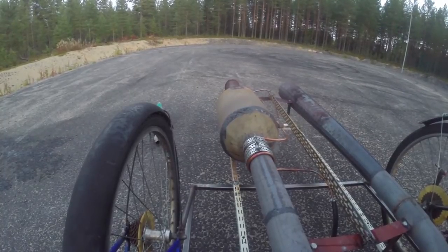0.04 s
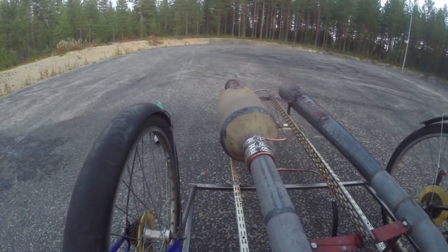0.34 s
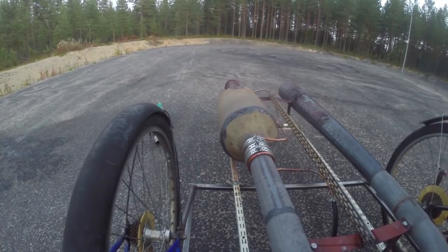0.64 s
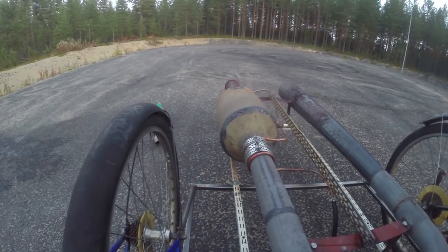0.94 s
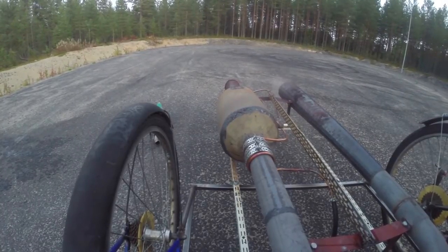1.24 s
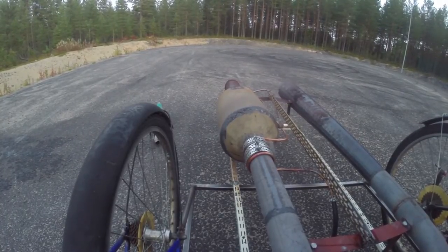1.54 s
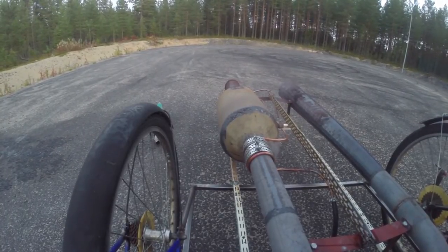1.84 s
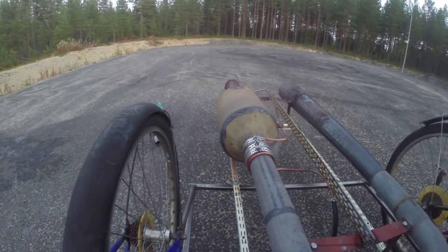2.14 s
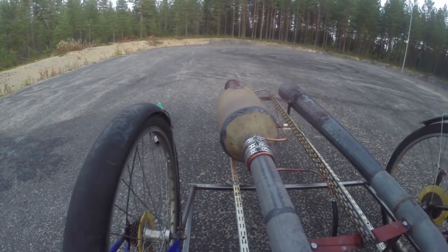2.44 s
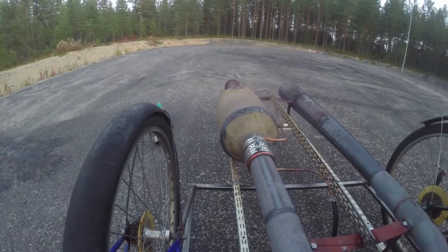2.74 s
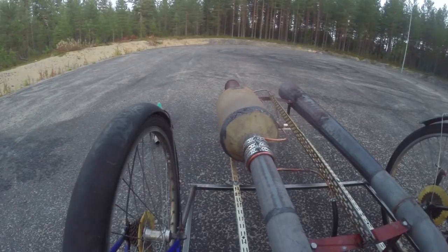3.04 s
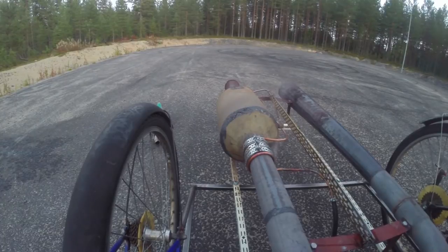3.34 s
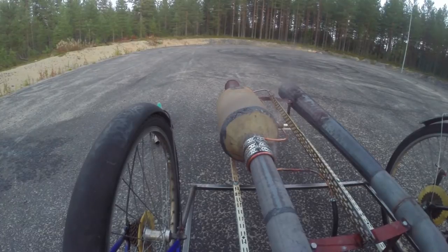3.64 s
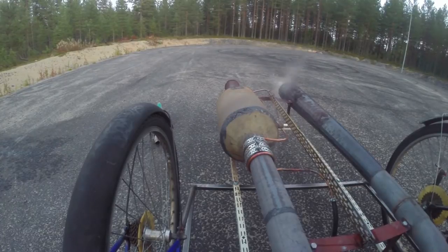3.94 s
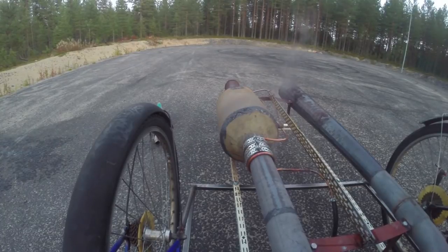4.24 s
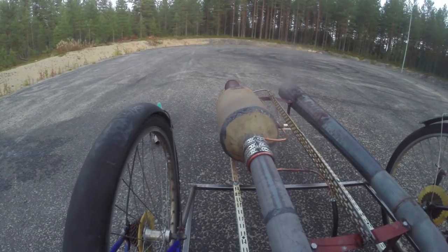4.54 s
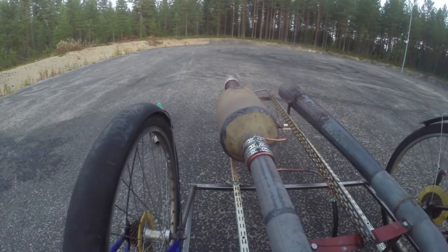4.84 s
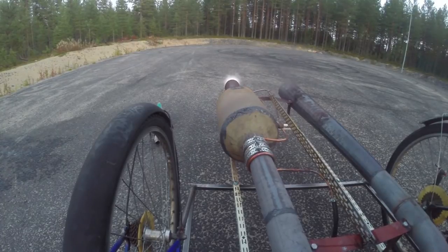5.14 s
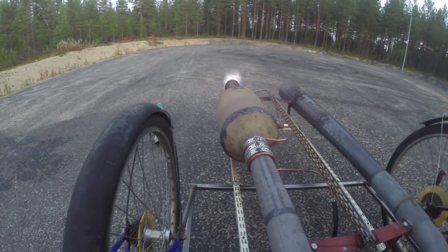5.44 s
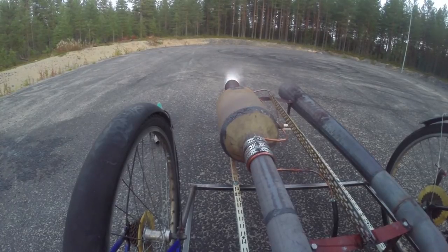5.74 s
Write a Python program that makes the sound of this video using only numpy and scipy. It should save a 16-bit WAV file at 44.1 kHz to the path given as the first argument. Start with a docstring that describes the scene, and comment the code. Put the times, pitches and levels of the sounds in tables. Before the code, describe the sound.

A pulsejet engine booms with a loud, rasping drone, faltering and sputtering, then speeds up and roars with flame.

```python
"""A loud, rasping boom, about sixty firings a second: a home-made pulsejet on a pedal trike parked in a
gravel lot, the microphone just behind its pipe. The gas column booms, hot gas rasps out with every
firing and the steel pipe knocks. The engine keeps faltering, hooting and catching again. Twice it runs
weak and sputters, hard bangs alternating with feeble ones; then it gets more fuel, speeds up and roars,
with flame at the mouth. A breathy draught and a low rumble lie underneath."""
import sys
import numpy as np
from scipy import signal
from scipy.fft import rfft, irfft
from scipy.io import wavfile

SR = 44100
rng = np.random.default_rng(int(sys.argv[2]) if len(sys.argv) > 2 else 0)


def unload_audio(sound):
    """Save the sound as a 16-bit wav file, at the path given as the first command line argument."""
    columns = np.transpose(np.atleast_2d(sound))
    # keep every value between -1 and 1, then stretch to whole-number steps
    steps = np.round(np.clip(columns, -1, 1) * 32767)
    wavfile.write(sys.argv[1], SR, steps.astype(np.int16))


N = 264600
TIME = np.arange(N) / SR

# hard firings: (time [s], crack level [relative dB], drop to the next firing [relative dB])
HARD_FIRINGS = [(0.343, -40, 4.5), (1.119, -42.5, 7), (1.26, -38.5, 9), (1.295, -38.5, 16),
                (1.327, -60, 12.5), (1.363, -37, 17.5), (1.45, -40, -4.5), (1.536, -43, -2),
                (1.944, -39, -0.5), (2.066, -45, 7.5), (2.196, -36, 1.5), (2.596, -41, 0), (2.632, -39, 4),
                (3.118, -62, 15), (3.152, -33.5, 19.5), (3.187, -54, 3), (3.22, -55, 8.5),
                (3.256, -53, 12.5), (3.288, -43, 11), (3.323, -51, 13), (3.422, -39.5, 18.5),
                (3.678, -38.5, 21), (3.778, -37.5, 20.5), (4, -32.5, 26), (4.067, -39, 3),
                (4.238, -39.5, 18), (4.483, -37, 4.5), (4.703, -41, 0), (4.818, -35.5, 0.5),
                (4.883, -32, -4.5), (4.944, -33.5, 1.5), (5.098, -36, 1.5), (5.234, -34, -1),
                (5.262, -29, -4), (5.456, -27.5, 4.5), (5.471, -25.5, 1), (5.558, -34, 3),
                (5.603, -35, 3.5), (5.719, -28.5, -0.5), (5.749, -32.5, -5), (5.803, -46, -1),
                (5.883, -26.5, -1.5), (5.937, -33, -0.5)]
# steel pipe resonances: (frequency [Hz], width [Hz], level [relative dB])
PIPE_MODES = [(404, 50, -10.5), (533, 61, -0.5), (676, 340, -9), (805, 92, 18), (860, 66, 5.5),
              (996, 150, 0.5), (1880, 160, -2.5), (4300, 570, -2.5)]
# spectrum of the turbulence in the pipe: (frequency [Hz], density [relative dB])
ROAR_SPECTRUM = [(330, 6), (420, 6.5), (500, -0.5), (600, 4.5), (720, -2), (830, -5), (930, 1),
                 (1080, -0.5), (1230, -7.5), (1450, -34)]


def burn_state():
    """How far the burn is faltering, running weak and taking extra fuel at each moment."""
    # the burn stumbles and catches again: (time [s], length [s], depth [1 = a clear stumble])
    falters = [(.07, .07, .5), (.3, .05, .9), (.46, .07, 1.1), (.67, .08, .5), (.81, .07, 1),
               (.98, .08, .35), (1.21, .12, 1.6), (1.42, .07, 1.4), (1.5, .08, .55), (1.74, .11, .95),
               (2, .09, .75), (2.13, .07, .9), (2.27, .07, .55), (2.45, .09, .3), (2.57, .08, 1.15),
               (2.76, .1, .6), (2.98, .09, 1.1), (3.07, .08, .9), (3.46, .04, .75), (3.63, .08, .55),
               (4.2, .07, .25), (4.8, .08, .35), (5, .08, .4), (5.37, .12, .6), (5.52, .07, .5),
               (5.65, .08, .8), (5.82, .08, .66)]
    # spells of weak running: (start [s], end [s])
    weak_spells = [(1.3, 1.38), (3.07, 4.31)]
    # extra fuel: (time [s], share of full feed [0-1])
    fuel_feed = [(4.25, 0), (4.4, .06), (4.8, .14), (4.92, .35), (5.08, .33), (5.2, .7), (5.55, .8),
                 (5.75, .92), (6, 1)]
    sink_s, recover_s = .068, .12
    weak = sum(np.clip(np.minimum((TIME - start) / sink_s, (end - TIME) / recover_s) + .5, 0, 1)
               for start, end in weak_spells)
    fuel, = in_time(fuel_feed)
    return swells(falters), weak, fuel


def firing_cycle(rate_hz):
    """Count of firings so far, drawn into step with the hard ones; ignition comes a bit early or late."""
    bang_phase, step_in_s = .051, .42   # where in its cycle a hard firing cracks; time to fall into step
    cycle = np.cumsum(rate_hz) / SR
    bang_s = np.array(HARD_FIRINGS)[:, 0]
    slip = np.unwrap((bang_phase - np.interp(bang_s, TIME, cycle)) % 1, period=1)
    nearness = np.exp(-((bang_s[:, None] - bang_s) / step_in_s) ** 2)
    cycle += np.interp(TIME, bang_s, nearness @ slip / nearness.sum(axis=1))
    return cycle + .006 * per_firing(cycle)


def sputter_db(rate_hz, surge, starve, width_s):
    """A hard firing swings the gas further and starves the firing after it."""
    marks = np.zeros(N)
    for time_s, _, drop_db in HARD_FIRINGS:
        at = round(time_s * SR)
        marks[at] += surge * drop_db
        marks[at + round(SR / rate_hz[at])] -= starve * drop_db
    return signal.fftconvolve(marks, signal.windows.gaussian(SR // 10 + 1, width_s * SR), "same")


def harmonic_levels(cycle, falter, weak, fuel):
    """The boom's first five harmonics follow the burn and wander; the upper three swell in the hoots."""
    # harmonics 1 to 5 by row: (steady level [dB], change in a falter [dB], when weak [dB], full fuel [dB])
    responses = [(-11.5, -2, -0.4, -6.5), (-16, -3.5, -5, -5.5), (-24.5, 0, 2.5, -9),
                 (-27.5, -4.5, -11, -1), (-35, 0, -3, 5)]
    # the pipe overblows and hoots: (time [s], length [s], swell of harmonic 3 [dB], 4 [dB], 5 [dB])
    hoots = [(.33, .05, 2.1, 3, 2), (.49, .06, 9.8, 0, 2), (.85, .07, 6.2, 8.5, 8),
             (1.19, 0.045, 8.7, -1, 0), (1.51, 0.071, 11.2, -2, 7), (1.77, 0.07, 8.7, 6, 8),
             (2.07, 0.056, 7.3, -2, 3), (2.18, 0.094, 4, 2.5, 6), (2.6, 0.1, 8.6, 5.5, 12),
             (3.02, 0.1, 8.5, -2, 4), (3.32, 0.094, 3.3, -7, 7), (3.57, 0.1, 3.6, 3.5, 8),
             (3.92, .07, 2, -11, 4.5), (3.83, 0.11, 2.1, 4, 4.5), (4.08, .07, 0.87, 13.5, 2.5),
             (4.17, 0.077, 3.3, 0, -10), (4.33, .09, 9.8, 7, 8), (5.24, 0.1, 1, 1.5, 6)]
    # slow chance swell of harmonics 1 to 5: (spread [dB])
    wander_db = [.1, 0.37, 0.6, 1.2, 1.2]
    time_s, length_s, *heights_db = np.transpose(hoots)
    hoots_db = [0, 0] + [swells(zip(time_s, length_s, column)) for column in heights_db]
    late_fuel = fuel ** 1.5   # the boom changes most as the feed nears full
    return [follow(response, falter, weak, late_fuel) + hoot_db + spread_db * per_firing(cycle / 4)
            for response, hoot_db, spread_db in zip(responses, hoots_db, wander_db)]


def gas_column(cycle, state, chug_db, swing_db, lag, open_end_hz):
    """The gas booms at the firing rate; higher harmonics lag and vary more from cycle to cycle."""
    # top harmonics together: (steady level [dB], change in a falter [dB], when weak [dB], full fuel [dB])
    top_response = (-28, -2.5, -16, -4)
    # top harmonics: (multiple of the firing rate, offset from their shared level [dB])
    overtones = [(6, -14), (7, -9.5)]
    top_db = follow(top_response, *state) + chug_db
    levels = [(k, db + swing_db / k ** .5 + .25 * k * per_firing(cycle))
              for k, db in enumerate(harmonic_levels(cycle, *state), start=1)]
    levels += [(k, top_db + db + 1.7 * per_firing(cycle)) for k, db in overtones]
    wave = sum(np.sqrt(2) * from_db(db) * np.cos(2 * np.pi * (k * cycle - lag * (k - 1) ** 2))
               for k, db in levels)
    open_end = signal.butter(4, open_end_hz, "high", fs=SR, output="sos")   # slow flow hardly radiates
    return signal.sosfiltfilt(open_end, wave, padtype="even", padlen=SR // 10)


def pipe_roar(cycle, force, steady):
    """Turbulence in the pipe swells three times a cycle: outflow, suction and rebound."""
    outflow = force * lobe(cycle, .0083, .099)
    suction = lobe(cycle, .31, .055)
    rebound = .5 * lobe(cycle, .6, .074)
    flow = (steady + outflow + suction + rebound) / np.sqrt(1 + force)
    return through_pipe(noise(ROAR_SPECTRUM) * flow * uneven(cycle, spread_db=2), ring_db=-2.5)


def pipe_knock(cycle, delay_cycles, soft_hz):
    """The pressure collapses shortly after each firing and gives the pipe's resonances a soft knock."""
    count = np.floor(cycle - delay_cycles + .0066 * per_firing(cycle))
    knocks = np.diff(count, prepend=count[0]) * uneven(cycle, spread_db=5.5)
    softened = signal.sosfilt(signal.butter(4, soft_hz, fs=SR, output="sos"), knocks + 1e-18)
    ringing = sum(from_db(db) * uneven(cycle, spread_db=3.6) * resonance(softened, hz, width_hz)
                  for hz, width_hz, db in PIPE_MODES)
    return -rms_one(ringing)


def exhaust_rasp(cycle, force, swing_db, steady):
    """Over a steady hiss, hot gas leaves in one bright spurt per firing, with a ragged trailing gust."""
    # the exhaust, close to the mouth: (frequency [Hz], density [relative dB])
    spectrum = [(900, 0), (1250, -6), (1550, -5), (2000, -1.5), (2300, -7), (2650, -6), (3100, -15),
                (3600, -16), (4400, -15.5), (5100, -24), (6300, -20), (8200, -28), (9800, -37),
                (15000, -56.5)]
    gust = .28 * lobe(cycle + .12 * per_firing(cycle), .24, .11) * uneven(cycle, spread_db=5.5)
    spurt = 2.26 * puff(cycle, start=-.092, rise=.028, decay=.11)
    pulses = (spurt + gust) * from_db(swing_db) * uneven(cycle, spread_db=4.5)
    flow = (steady + force * pulses) / (1 + force)
    return through_pipe(noise(spectrum) * flow, ring_db=-7)


def bangs(rise_s, crack_decay_s, bark_delay_s, bark_decay_s):
    """Hard firings spit a short, broad burst of noise; the collapse after it makes the pipe bark."""
    # the crack: (frequency [Hz], density [relative dB])
    spectrum = [(200, -15), (600, 2.5), (950, 9), (1400, -7), (2000, -1), (3200, -13.5), (4300, -19.5),
                (5200, -24.5), (6500, -23), (9000, -35.5), (15000, -45)]
    time_s, crack_db, _ = np.transpose(HARD_FIRINGS)
    marks = np.zeros(N)
    marks[np.round(time_s * SR).astype(int)] = from_db(crack_db)
    age = np.arange(-SR // 20, SR // 20 + 1) / SR

    def bursts(delay_s, decay_s):
        shape = np.exp(np.minimum((age - delay_s) / rise_s, (delay_s - age) / decay_s))
        return signal.fftconvolve(marks, shape, "same")
    crack = bursts(0, crack_decay_s) * noise(spectrum)
    bark = bursts(bark_delay_s, bark_decay_s) * noise(ROAR_SPECTRUM)
    return from_db(8) * crack + from_db(12) * bark


def flame(cycle):
    """With more fuel a tongue of flame shoots out of the mouth at every firing and burns in open air."""
    # flame at the mouth: (time [s], level [dB])
    levels = [(0, -70.5), (4.4, -53), (4.85, -37), (5.05, -30), (5.25, -26.5), (5.6, -26.5), (6, -25)]
    # its colour: (frequency [Hz], density [relative dB])
    spectrum = [(200, -5), (350, 11), (500, -15), (1000, 7), (1400, -10.5), (2000, -11), (3000, -28.5),
                (4000, -32.5)]
    level_db, = in_time(levels)
    tongue = puff(cycle, start=-.094, rise=.015, decay=.32) * uneven(cycle, spread_db=5)
    return from_db(level_db) * rms_one(noise(spectrum) * tongue)


def draught():
    """The draught sings in the pipe; in the long weak spell a higher breathy whistle comes and goes."""
    # the whistle: (time [s], level [dB])
    whistle_levels = [(3.3, -75), (3.38, -38), (3.43, -51), (3.47, -48), (3.53, -37.5), (3.66, -49.5),
                      (3.8, -75)]
    whistle_db, = in_time(whistle_levels)
    whistle = from_db(whistle_db) * breathy_tone(hz=1088, width_hz=95)
    return whistle + from_db(-46) * breathy_tone(hz=895, width_hz=110)


def rumble():
    """Unsteady burning rumbles under the engine and buffets the air behind the pipe."""
    # unsteady burning: (time [s], rumble level [dB], buffeting level [dB])
    levels = [(0, -22.5, -52), (1.3, -22.5, -38.5), (2.8, -24, -52), (3.5, -33, -42), (4.2, -26.5, -45.5),
              (4.5, -24, -50), (5.05, -22.5, -41.5), (5.3, -22.5, -37.5), (6, -21, -28)]
    # the rumble: (frequency [Hz], density [relative dB])
    rumble_spectrum = [(45, -13), (78, 1), (105, -10.5), (150, 2), (210, -10.5), (280, -2.5), (350, -17.5),
                       (500, -40)]
    # the buffeting air: (frequency [Hz], density [relative dB])
    buffet_spectrum = [(12, -10), (25, 3), (45, 14.5), (70, 12), (120, -43)]
    rumble_db, buffet_db = in_time(levels)
    return from_db(rumble_db) * noise(rumble_spectrum) + from_db(buffet_db) * noise(buffet_spectrum)


def through_pipe(x, ring_db):
    """Gas noise leaves the pipe partly straight and partly through its resonances."""
    ringing = sum(from_db(ring_db + db) * resonance(x, hz, width_hz) for hz, width_hz, db in PIPE_MODES)
    return rms_one(x + ringing)


def follow(response, falter, weak, fuel):
    """A steady value, shifted by each state of the burn."""
    steady, in_falter, when_weak, at_full_fuel = response
    return steady + in_falter * falter + when_weak * weak + at_full_fuel * fuel


def per_firing(cycle):
    """A fresh, bounded chance value for every firing, gliding from one to the next."""
    draws = np.clip(rng.standard_normal(512), -2.2, 2.2)
    return np.interp(cycle + 2, np.arange(len(draws)), draws)


def uneven(cycle, spread_db):
    """A gain that varies by chance from firing to firing."""
    return from_db(spread_db * per_firing(cycle))


def lobe(cycle, centre, width):
    """A smooth hump once a cycle; centre and width in cycles."""
    offset = (cycle - centre + .5) % 1 - .5
    return np.exp(-.5 * (offset / width) ** 2)


def puff(cycle, start, rise, decay):
    """An abrupt swell once a cycle that dies away; times in cycles."""
    age = (cycle - start) % 1
    return (1 - np.exp(-age / rise)) * np.exp(-age / decay)


def swells(rows):
    """A smooth hump for each (time [s], length [s], height)."""
    return sum(height * np.exp(-(2 * (TIME - time_s) / length_s) ** 2) for time_s, length_s, height in rows)


def in_time(rows):
    """Each column of a curve, joined by straight lines in time."""
    time_s, *columns = np.transpose(rows)
    return [np.interp(TIME, time_s, column) for column in columns]


def noise(spectrum):
    """Unit noise with a given spectrum, falling steeply beyond its ends."""
    hz, db = np.transpose(spectrum)
    bin_hz = np.maximum(np.fft.rfftfreq(N, 1 / SR), 1)
    skirts = np.minimum(bin_hz / hz[0], 1) ** 4 * np.minimum(hz[-1] / bin_hz, 1) ** 4
    gain = from_db(np.interp(np.log(bin_hz), np.log(hz), db)) * skirts
    return rms_one(irfft(rfft(rng.standard_normal(N)) * gain, N))


def breathy_tone(hz, width_hz):
    """Unit noise narrowed to one resonance."""
    band = resonance(rng.standard_normal(N), hz, width_hz)
    return rms_one(resonance(band, hz, width_hz))


def resonance(x, hz, width_hz):
    """Two-pole band-pass with unit gain at its top."""
    radius = np.exp(-np.pi * width_hz / SR)
    feedback = [1, -2 * radius * np.cos(2 * np.pi * hz / SR), radius ** 2]
    return signal.lfilter(np.array([1, 0, -1]) * (1 - radius ** 2) / 2, feedback, x + 1e-18)


def from_db(db):
    """Decibels to gain."""
    return 10 ** (np.asarray(db) / 20)


def rms_one(x):
    """Scale to unit power."""
    return x / np.sqrt(np.mean(x ** 2) + 1e-20)


def scene():
    """The engine from just behind its pipe: the state of the burn sets the firing rate and levels."""
    # firing rate: (steady [Hz], change in a falter [Hz], when weak [Hz], full fuel [Hz])
    rate_response = (61.74, -5.0, -2.4, 8.8)
    # roar, rasp, knock: (steady [relative dB], change in a falter [dB], when weak [dB], full fuel [dB])
    roar_response = (-28.5, -7.5, -9.5, 4.5)
    rasp_response = (-36.5, -4, -5.5, 5)
    knock_response = (-35, -6.5, -14, 5)
    # the burn catches hard and chugs: (time [s], length [s], rise of the roar [dB])
    chugs = [(.01, 0.056, 5.5), (.12, .04, 3), (.36, 0.04, 4.5), (.89, .07, 3), (1.11, .05, 3),
             (1.56, .08, 1.5), (1.85, 0.1, 2), (2.06, .04, 5), (2.2, 0.035, 1), (2.35, 0.034, 2),
             (2.65, 0.054, 4.5), (2.87, .07, 1.5), (4.39, .06, 2.5), (4.89, .04, 5.5), (5.12, .08, 3)]
    state = burn_state()
    chug_db = swells(chugs)
    rate_hz = follow(rate_response, *state)
    roar_db = follow(roar_response, *state) + chug_db
    rasp_db = follow(rasp_response, *state) + .41 * chug_db
    knock_db = follow(knock_response, *state) + 1.5 * chug_db
    cycle = firing_cycle(rate_hz)
    force = from_db(.047 * (roar_db - np.mean(roar_db)))   # a harder burn pulses more deeply
    swing_db = sputter_db(rate_hz, surge=.33, starve=.88, width_s=.0047)
    boom = gas_column(cycle, state, chug_db, swing_db, lag=.18, open_end_hz=42.5)
    knock = from_db(knock_db) * pipe_knock(cycle, delay_cycles=.2072, soft_hz=1120)
    roar = from_db(roar_db + .5 + .5 * swing_db) * pipe_roar(cycle, force, steady=.55)
    rasp = from_db(rasp_db - 2) * exhaust_rasp(cycle, force, 1.41 * swing_db, steady=.51)
    low_rumble = rumble()
    cracks = bangs(rise_s=.0011, crack_decay_s=.0045, bark_delay_s=.005, bark_decay_s=.0043)
    return boom + roar + knock + rasp + cracks + flame(cycle) + draught() + low_rumble


def record(dry):
    """One close microphone: the sound starts without a click, peaks are rounded and the top is cut."""
    fade_in_s, ceiling, cutoff_hz = .002, .9, 15500
    rounded = dry / (1 + (dry / ceiling) ** 8) ** (1 / 8)
    faded = np.minimum(TIME / fade_in_s, 1) * rounded
    return signal.sosfilt(signal.cheby2(12, 70, cutoff_hz, fs=SR, output="sos"), faded)[None]


dry = scene()
out = record(dry)
unload_audio(out)
```